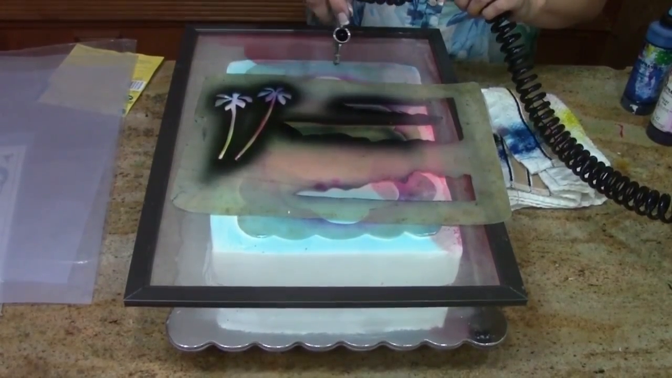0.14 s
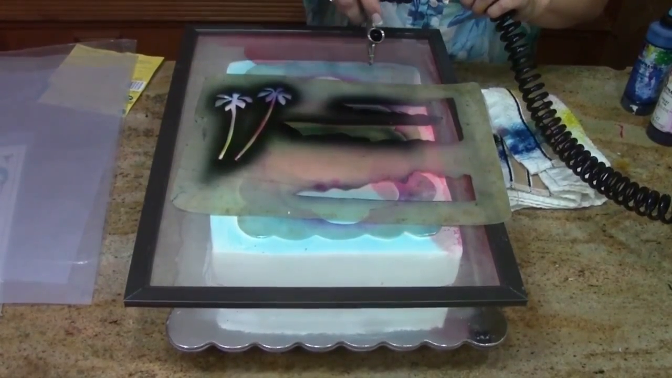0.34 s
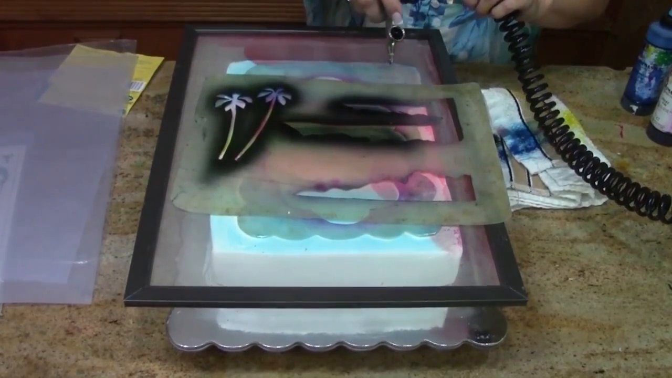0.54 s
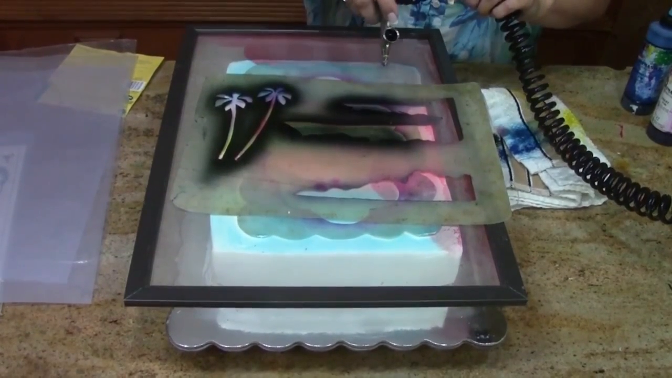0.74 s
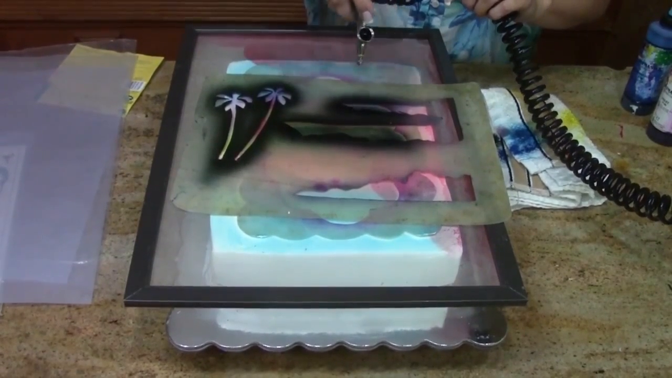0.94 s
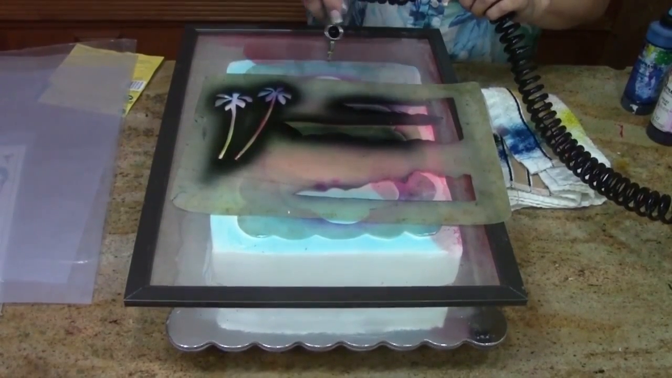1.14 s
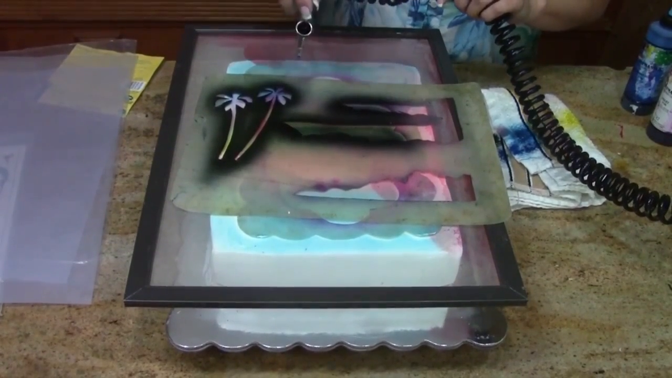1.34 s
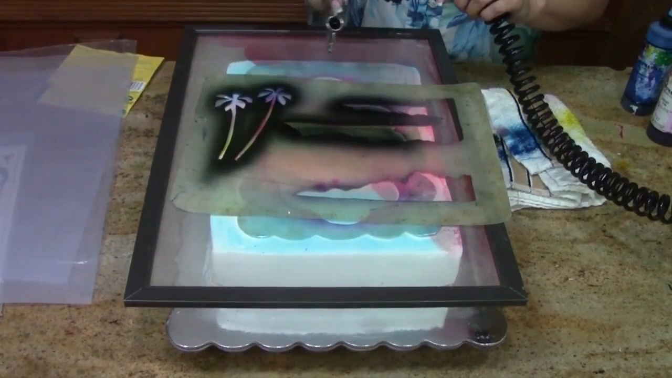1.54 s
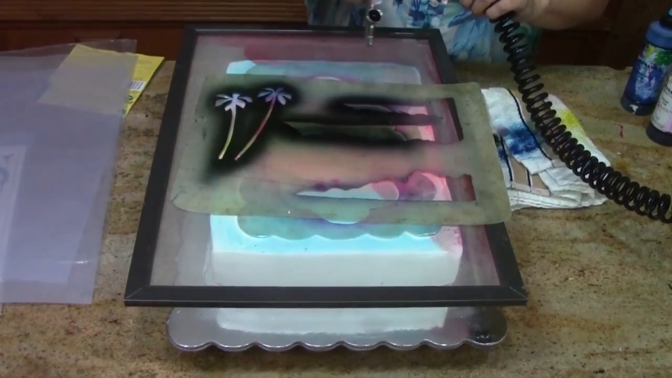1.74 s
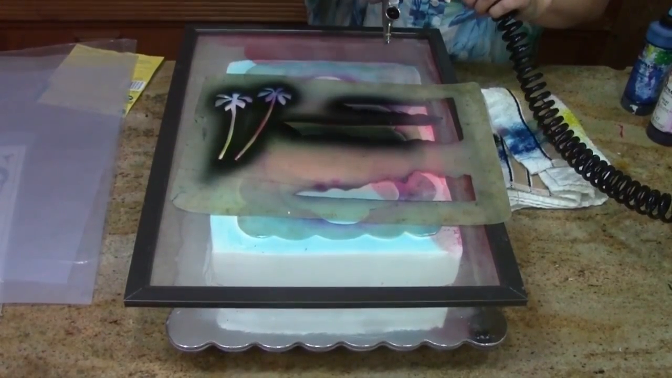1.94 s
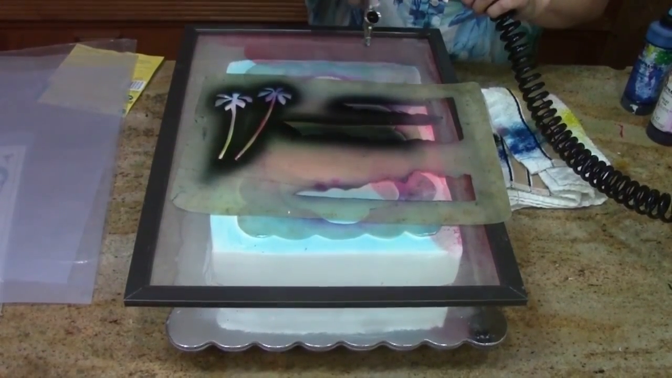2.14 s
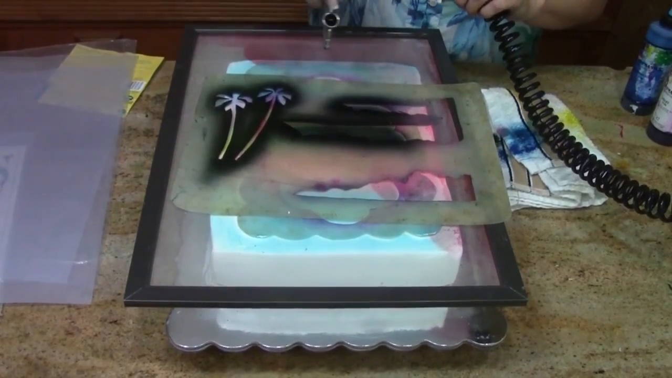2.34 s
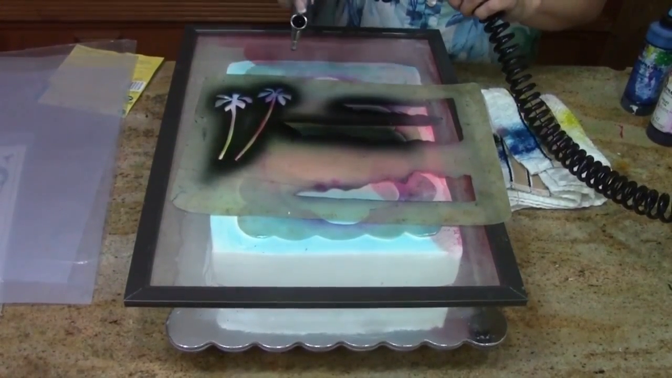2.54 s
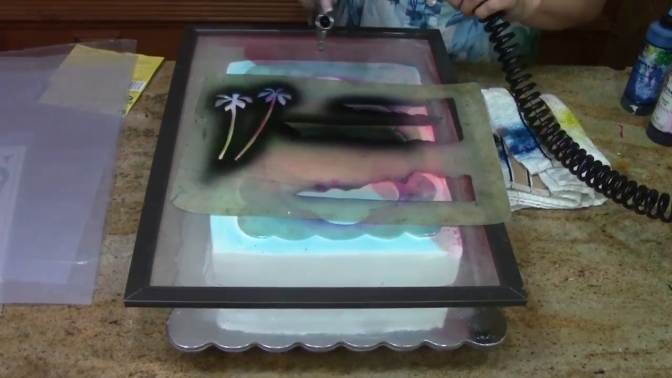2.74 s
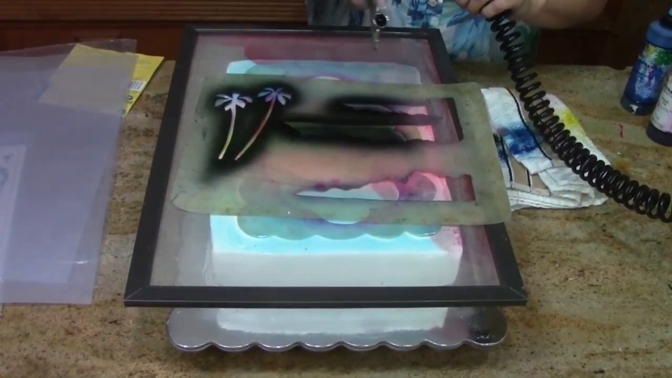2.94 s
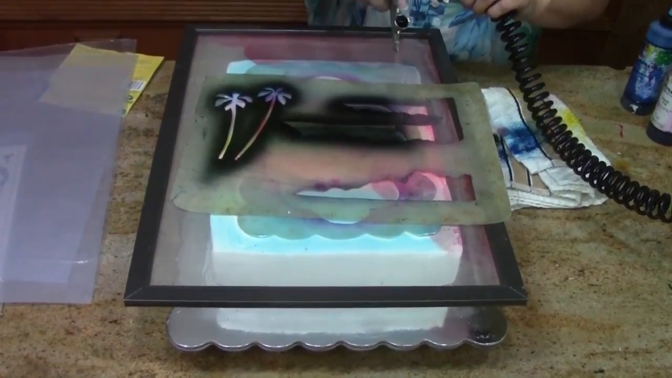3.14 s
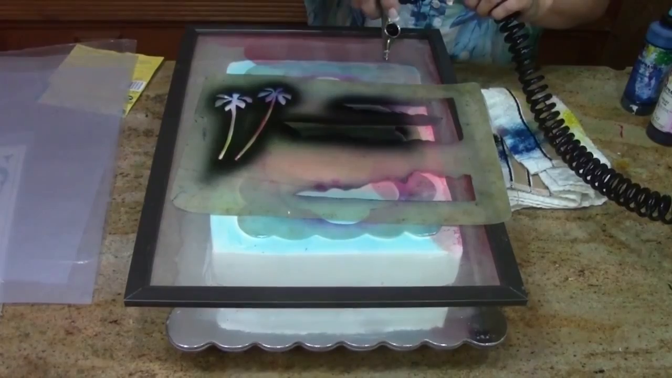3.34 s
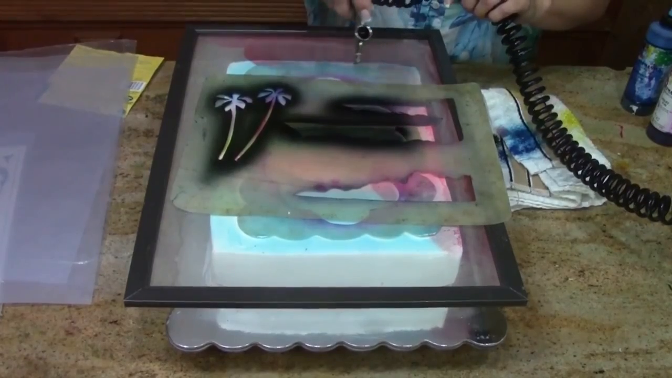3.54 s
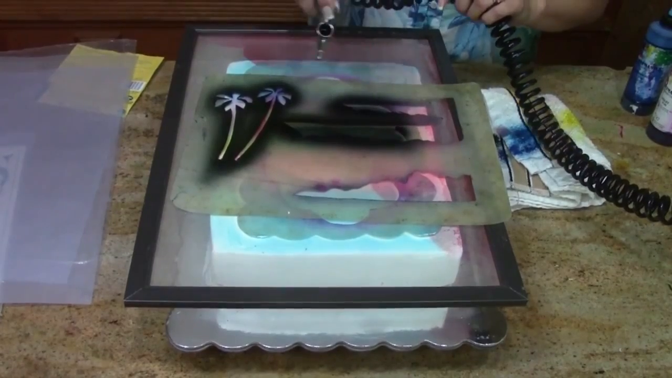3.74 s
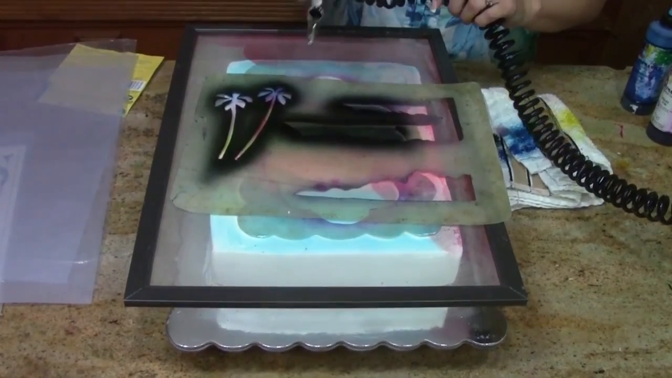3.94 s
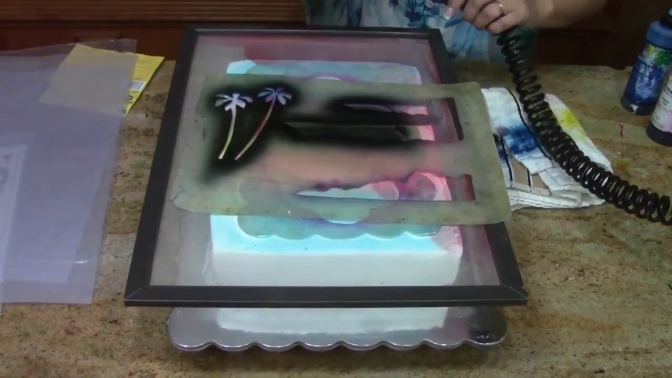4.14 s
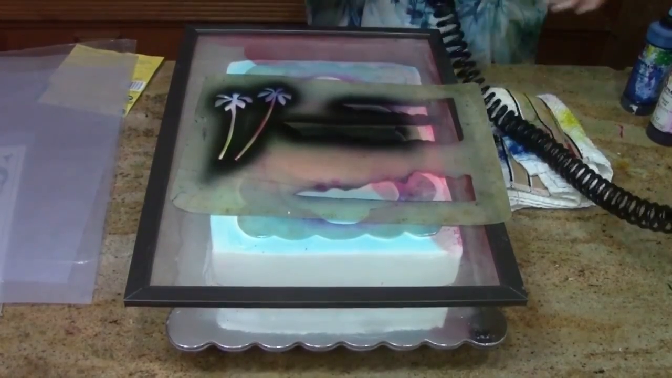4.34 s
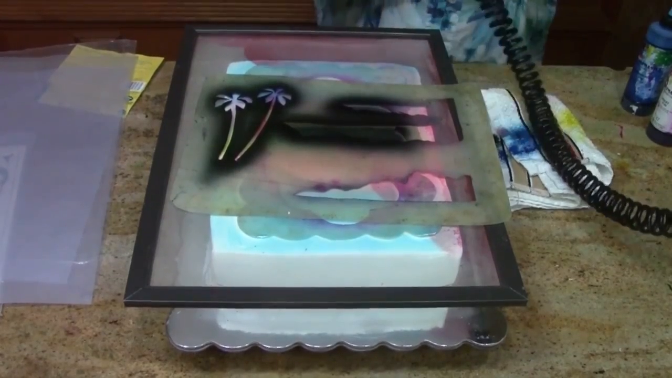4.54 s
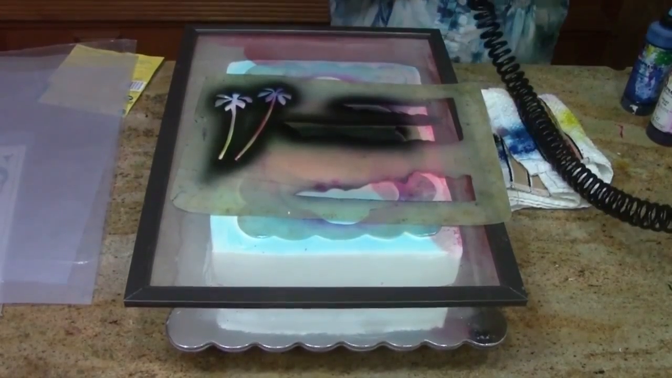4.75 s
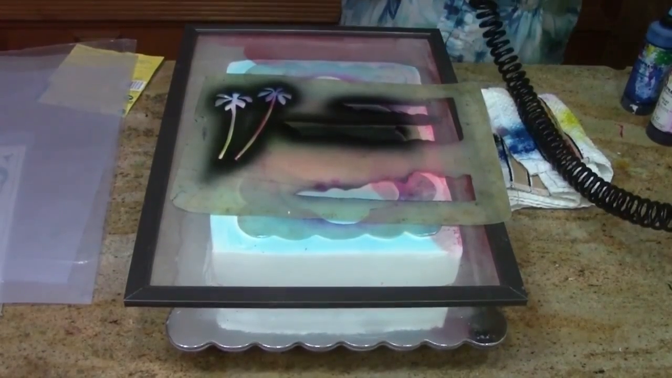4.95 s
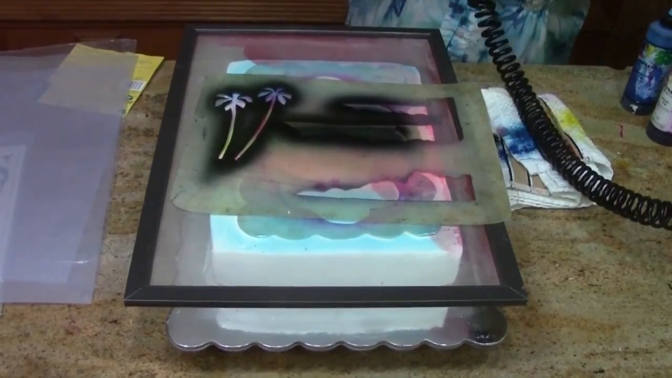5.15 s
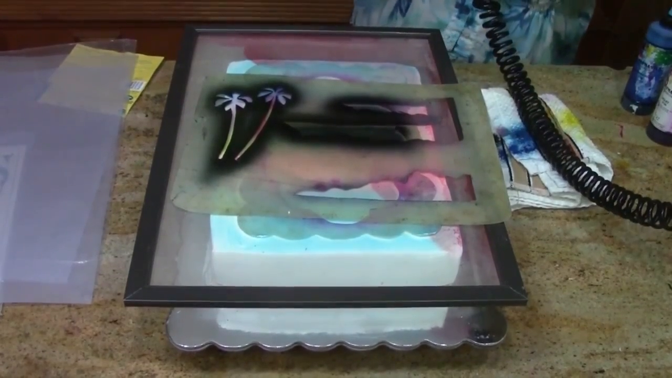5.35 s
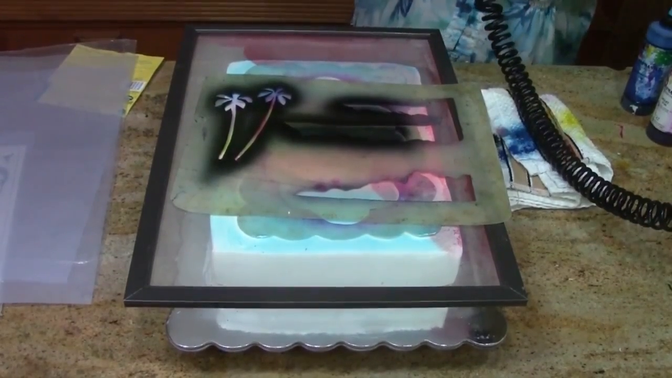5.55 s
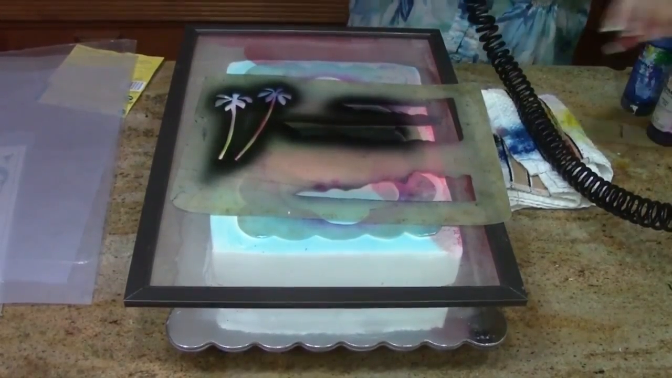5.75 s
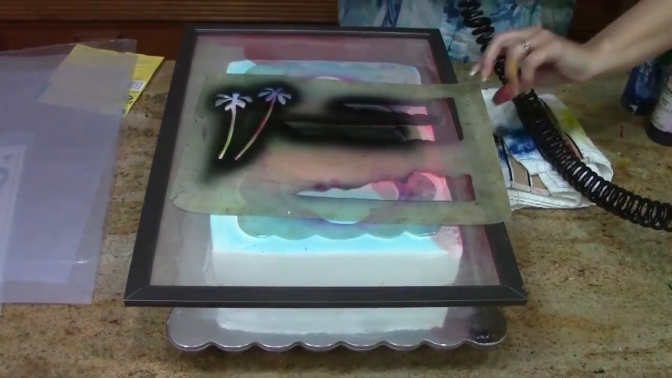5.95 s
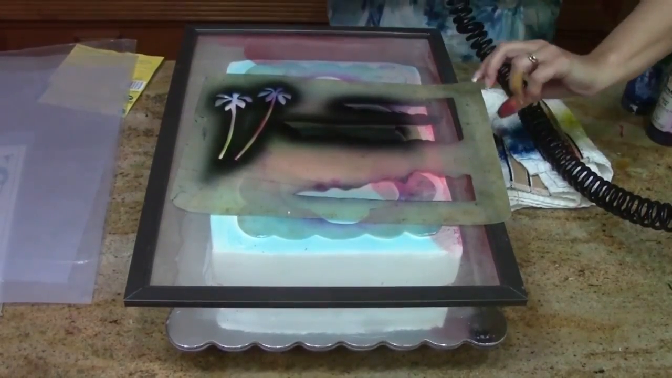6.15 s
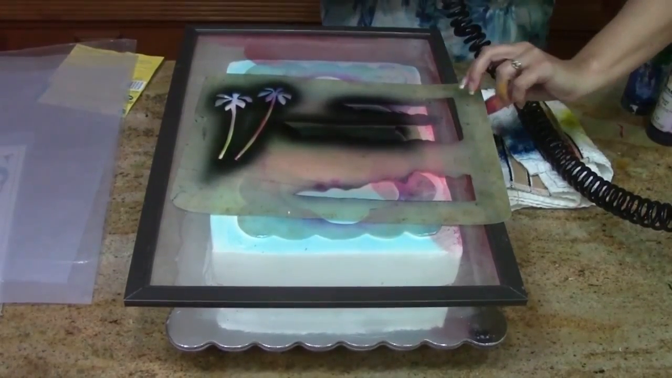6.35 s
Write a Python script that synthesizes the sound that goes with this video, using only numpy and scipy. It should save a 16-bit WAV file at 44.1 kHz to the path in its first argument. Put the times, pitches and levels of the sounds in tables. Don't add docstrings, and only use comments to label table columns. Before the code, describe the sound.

In a small room, heard from about arm's length, a piston compressor drones with a low, rough buzz, fast fluttering inlet gasps and housing rattle. Over it an airbrush hisses brightly in separate passes: one already under way until 0.7 s, another at 0.8-1.3, a softer one at 1.4-2.0, one swelling from 2.1 to 2.7, a fuller, fading one at 2.75-3.4 with a sharp spit near 3.25, and a strong last one at 3.5-4.1. Brief hollow rushes mark stencil edges. From 4.1 the compressor and a thin, weakening air seep continue. At 5.26 a plastic switch clicks, air puffs, and the motor collapses; rough hollow knocks follow at 5.4 and 5.47, slowing. At 5.6 a louder, crisp relay snap rings briefly in the room. The remaining leak hiss fades quickly into low house rumble, with a faint distant whirr from 5.9 to the end at about 6.4.

```python
import sys
import numpy as np
from scipy import signal
from scipy.fft import rfft, irfft, next_fast_len
from scipy.io import wavfile
from scipy.ndimage import map_coordinates

SR = 44100
rng = np.random.default_rng(int(sys.argv[2]) if len(sys.argv) > 2 else 0)


def rack_gain(trim_db):
    fader = np.asarray(trim_db, float)
    return 10 ** (fader / 20)


def transcribe(u):
    v = np.clip(np.atleast_2d(u).T, -1, 1)
    q = np.round(v * 32767).astype(np.int16)
    wavfile.write(sys.argv[1], SR, q)


N = 285760

PUMP_HZ = 27.922
SWITCH_OFF_S = 5.295
INTAKE_OPENS, INTAKE_SHARE = 0.65, 0.382

# pitch_hz, level_db (per Hz)
NOZZLE = [(3000, -11.5), (4200, -9), (5400, -7), (6500, -3.5), (8000, 0), (10300, 2.5), (11500, 0.5),
          (12500, -4.5)]
# pitch_hz, level_db (per Hz)
SPLASH = [(900, -26), (1700, 0.5), (2200, 4), (3100, 4.5), (3600, 2.5), (4700, 2), (5800, -5),
          (7000, -11.5)]
# pitch_hz, level_db (per Hz)
EDGE_COLOUR = [(1500, -15), (2000, -2), (2600, 0.5), (3200, 1), (3900, -11), (6000, -21)]


def escaping_air(time):
    top_gain, body_gain, splash_gain, edge_gain = trigger(time)
    jet = rippled(nearby_echoes(hiss(NOZZLE, patchy_db=0.55)))
    top = coloured(jet, [(8800, -30), (9300, -9), (10000, 0)])
    body = jet - top
    nozzle = top_gain * rms_one(top) + body_gain * rms_one(body)
    spray = nearby_echoes(hiss(SPLASH, patchy_db=0.66))
    rush = coloured_noise(EDGE_COLOUR)
    return (nozzle + splash_gain * spray + edge_gain * rush) * powered(time)


# start_s, end_s, start_level_db, end_level_db, body_db
SWEEPS = [
    (-.1, 0.68, -36, -36.5, -4),
    (0.79, 1.3, -36.5, -36.5, -3.0),
    (1.42, 2.018, -39, -38.5, -3.0),
    (2.12, 2.718, -44.5, -38.5, -1.1),
    (2.75, 3.43, -42.5, -45, 1.3),
    (3.473, 4.074, -36, -36, -2.2),
]
# time_s, level_db, half_length_s, body_db
SPITS = [
    (3.251, -30.5, 0.021, -3),
    (3.37, -41, 0.031, 0.5),
]
# time_s, level_db, half_length_s
EDGES = [(0.024, -37.5, 0.047), (.55, -47, 0.15), (.95, -46, 0.1), (1.42, -42.5, 0.12), (2.247, -48, 0.075),
         (2.67, -41, 0.048), (2.78, -39, 0.046), (3.556, -48, .03)]


def trigger(time):
    pull_s, ease_s = 0.095, 0.09
    idle_db, idle_body_db = -42, 0.4
    let_go_s, sag_db_per_s = 4.23, 4
    throb_share = 0.15
    splash_db, splash_idle_db = -49, -48

    sag_db = -sag_db_per_s * np.maximum(time - let_go_s, 0)
    throb = 1 + throb_share * (2 * inlet_open(time) - 1)
    top = (throb * rack_gain(idle_db + sag_db)) ** 2
    body = top * rack_gain(idle_body_db) ** 2
    pulled = 0
    for start, end, from_db, to_db, body_db in SWEEPS:
        travel = np.clip(np.minimum((time - start) / pull_s, (end - time) / ease_s) + 0.5, 0, 1)
        flow = (travel * rack_gain(np.interp(time, [start, end], [from_db, to_db]))) ** 2
        top = top + flow
        body = body + flow * rack_gain(body_db) ** 2
        pulled = pulled + travel
    for s, db, half, body_db in SPITS:
        flow = (rack_gain(db) * bump(time, s, half)) ** 2
        top = top + flow
        body = body + flow * rack_gain(body_db) ** 2
    splash = rack_gain(splash_idle_db) ** 2 + (rack_gain(splash_db) * pulled) ** 2
    edge = sum((rack_gain(db - 1.5) * bump(time, s, half)) ** 2 for s, db, half in EDGES)
    return np.sqrt([top, body, splash, edge])


def hiss(spectrum, patchy_db):
    out, together = 0, drift(5.0)
    white = [coloured(w, spectrum) for w in rng.standard_normal((2, N))]
    edges = np.geomspace(800, 14000, num=9)
    for k, (low, high) in enumerate(zip(edges, edges[1:])):
        band_pass = signal.butter(2, [low, high], "band", fs=SR, output="sos")
        band = signal.sosfilt(band_pass, white[k % 2])
        out = out + band * rack_gain(patchy_db * (0.83 * together + drift(10.0)))
    return rms_one(out)


def rippled(jet):
    lag_ms = 0.165 + 0.012 * drift(0.8)
    late = map_coordinates(jet, [np.arange(N) - lag_ms * SR / 1000], order=3, mode="nearest")
    return jet + rack_gain(-16) * late


# delay_ms, level_db
ECHOES = [(2.3, -17), (4.1, -16), (7.7, -16), (12.1, -17)]


def nearby_echoes(x):
    return rms_one(x + sum(rack_gain(db) * np.roll(x, round(ms * SR / 1000)) for ms, db in ECHOES))


# pitch_hz, width_hz, level_db
HOUSING = [(91.5, 49, -64.5), (165, 180, -62), (288, 180, -58.5), (390, 81, -56.5), (760, 100, -50.5),
           (1004, 49, -53), (1270, 214, -48.5), (1620, 12, -62)]


def compressor(time):
    turn = PUMP_HZ * time
    drone = rack_gain(-44.5) * crank_orders(time)
    valves = valve_open(turn, 0.073, 0.387) + 0.5 * valve_open(turn, 0.556, 0.49)
    shaking = rng.standard_normal(N) * (0.5 + valves)
    rattle = sum((-1) ** i * rack_gain(db) * rms_one(ring(shaking, hz, 1.7 / width))
                 for i, (hz, width, db) in enumerate(HOUSING))
    return powered(time) * drone + powered(time) ** 0.13 * rattle


# order (multiple of the crank rate), level_db
PUMP_ORDERS = [(3, -11), (4, -14), (6, -4), (7, -6.5), (8, -9.5), (9, -12.5), (10, -4.5), (11, -9),
               (12, -14.5), (13, -7), (14, 0), (16, -8), (18, -13), (21, -9), (22, -12.5), (24, -1),
               (25, -1), (26, 1), (27, -12), (28, -8.5), (30, -12.5), (35, -9.5), (36, -11.5), (38, -12),
               (15, -14.5), (42, -10), (44, -12), (43, -13), (54, -6.5), (55, -14.5)]
# up_to_hz, moment (share of a turn)
KNOCK_TIMING = [(90, 0.0), (170, .29), (200, .55), (310, .07), (480, .49), (620, .76), (730, .35),
                (815, .8), (930, .38)]


def crank_orders(time):
    orders = np.arange(1, 61)
    levels_db = -21 - 0.14 * orders
    for order, db in PUMP_ORDERS:
        levels_db[order - 1] = db
    tops_hz, shares = np.transpose(KNOCK_TIMING)
    part = np.searchsorted(tops_hz, orders * PUMP_HZ)
    scattered = rng.random(len(orders))
    timing = np.where(part < len(shares), shares[part % len(shares)], scattered)
    lags = np.cumsum(timing + rng.normal(0, 0.02, len(orders)))
    angle = np.linspace(0, 1, num=4097)
    phase = 2 * np.pi * (np.outer(orders, angle) - lags[:, None])
    lines = rack_gain(levels_db)[:, None] * np.sqrt(2) * np.cos(phase)
    turn = PUMP_HZ * time % 1
    out = np.interp(turn, angle, lines.sum(axis=0))
    for group in range(6):
        weighted = orders[group::6] @ lines[group::6]
        out += 0.0035 * drift(1.3) * np.interp(turn, angle, weighted)
    return out


# crank_orders_added, level_db
MAGNETIC_PULL = [(0, -68), (1, -65), (10, -68), (15, -69), (20, -67), (23, -58), (24, -67), (26, -66),
                 (-26, -67), (-28, -65), (-30, -57), (-35, -66)]


def motor_hum(time):
    magnetic_hz = 119.9
    buzz_hz, buzz_width_hz, buzz_db, scatter_db = 1170, 190, -64.5, 2.0
    orders = np.arange(-64, 56)
    line_hz = np.abs(orders) * PUMP_HZ + np.sign(orders + 0.5) * magnetic_hz
    away = (line_hz - buzz_hz) / buzz_width_hz
    levels_db = buzz_db - 5 * away ** 2 + scatter_db * rng.standard_normal(len(orders))
    for order, db in MAGNETIC_PULL:
        levels_db[orders == order] = db
    levels_db[orders == -1] = -200
    angle = np.linspace(0, 1, num=4097)
    turns = np.outer(np.abs(orders), angle) + rng.random((len(orders), 1))
    lines = rack_gain(levels_db)[:, None] * np.exp(2j * np.pi * turns)
    turn = PUMP_HZ * time % 1
    up = np.interp(turn, angle, lines[orders >= 0].sum(axis=0))
    down = np.interp(turn, angle, lines[orders < 0].sum(axis=0))
    pull = np.exp(2j * np.pi * magnetic_hz * time)
    below = rack_gain(-57.5) * np.exp(-2j * np.pi * PUMP_HZ * time)
    return powered(time) * np.sqrt(2) * np.real((up + below) * pull + down / pull)


# pitch_hz, level_db (per Hz)
INTAKE = [(1800, 4), (3000, -21), (4600, -4), (5600, -7), (7500, 0), (10000, 10), (12000, 6.5)]
# pitch_hz, width_hz, level_db
WHISTLES = [(3030, 140, -61.5), (4740, 230, -57.5), (6800, 200, -63)]


def intake(time):
    gasp = inlet_open(time)
    pipes = sum(rack_gain(db + 1.0 * drift(3.2)) * whistle(hz, width) for hz, width, db in WHISTLES)
    breath = rack_gain(-44.5) * rms_one(gasp * coloured(rng.standard_normal(N), INTAKE))
    return powered(time) * (breath + (0.6 + gasp) * pipes)


# time_s, swell_db, brightness_db, half_length_s
LAST_STROKES = [
    (5.285, -60, -1, .011),
    (5.345, -60, 19, 0.022),
    (5.393, -34, -5.5, 0.02),
    (5.425, -55, 11, 0.019),
    (5.468, -46.5, 0, .022),
    (5.522, -54, 2, 0.021),
    (5.6, -61, -4, 0.041),
]
# pitch_hz, level_db, width_hz, roughness
CYLINDER = [(396, 0, 50, .15), (770, -3, 80, .6), (1200, -16, 80, 1.5), (1510, -12, 60, .6)]


def last_strokes(time):
    out = np.zeros(N)
    sag = 0.87 * np.clip(time - 5.43, 0, 0.3)
    stretched = np.cumsum(1 - sag) / SR
    for i, (hz, db, width, rough) in enumerate(CYLINDER):
        tone = rms_one(np.sin(2 * np.pi * hz * stretched) + rough * whistle(hz, width))
        swell = 0
        for s, blow_db, bright_db, half in LAST_STROKES:
            level_db = blow_db + db - 2.5 + bright_db * (i > 0)
            swell = swell + rack_gain(level_db) * np.exp(-np.clip((time - s) / half, -9, 9) ** 4)
        out += swell * tone
    return out


# level_db, pitch_hz, width_hz, fade_s
SHUDDER = (-49, 120, 200, 0.14)


def shudder(time):
    db, hz, width, fade = SHUDDER
    since = time - SWITCH_OFF_S
    swell = np.clip(since / 0.02 + 1, 0, 1) * np.exp(-np.maximum(since, 0) / fade)
    return rack_gain(db) * swell * whistle(hz, width)


# time_s, peak_db, room_tail_db
SNAPS = [
    (5.259, -23, -24),
    (5.5948, -17, -16),
]
# pitch_hz, level_db, t60_s
SNAP_MODES = [(1360, -9, 0.053), (2500, -0.5, 0.018), (3210, -2, 0.034), (4070, 2, 0.01), (5200, 4, 0.0041),
              (6780, 5, 0.0084), (8900, 4, 0.0062), (10800, 6, 0.0044)]
# pitch_hz, level_db (per Hz)
TAIL = [(700, -2), (1350, -2.5), (1900, -13), (2500, 6.5), (3300, 1), (4800, 0), (7000, -6), (12000, -14)]


def snaps(time):
    out, echo, tail_t60_s = np.zeros(N), coloured_noise(TAIL), 0.36
    for s, peak_db, tail_db in SNAPS:
        click = np.zeros(N)
        click[round(s * SR)] = rack_gain(peak_db - 8.5)
        out += sum((-1) ** i * rack_gain(db) * ring(click, hz, t60)
                   for i, (hz, db, t60) in enumerate(SNAP_MODES))
        since = np.maximum(time - s, 0)
        fade = rack_gain(peak_db + tail_db - 60 * since / tail_t60_s)
        out += fade * np.clip(since / 0.0014, 0, 1) * echo
    return above(out, 1060)


# pitch_hz, level_db (per Hz)
PUFF_COLOUR = [(1500, -14), (3500, -10), (5000, 4), (6500, 4), (8000, -2), (12000, -9)]
# pitch_hz, level_db (per Hz)
LEAK_COLOUR = [(900, -23), (1500, -6.5), (2400, 0.5), (4200, 0), (5700, 3), (8200, 2.5), (9200, 4),
               (12500, 2.5)]


def leak(time):
    vent_s, opens_s, puff_s = 5.27, 0.038, 0.04
    bleeds_from_s, bleed_db_per_s = 5.626, 20
    opened = np.clip((time - vent_s) / opens_s + 1, 0, 1)
    puff = rack_gain(-36) * np.exp(-np.maximum(time - vent_s, 0) / puff_s)
    steady = rack_gain(-44 - bleed_db_per_s * np.maximum(time - bleeds_from_s, 0))
    return opened * (puff * coloured_noise(PUFF_COLOUR) + steady * coloured_noise(LEAK_COLOUR))


# time_s, level_db, half_length_s, pitch_hz, width_hz
SWISH = (5.53, -59, .03, 1950, 400)


def swish(time):
    s, db, half, hz, width = SWISH
    return rack_gain(db) * bump(time, s, half) * whistle(hz, width)


# pitch_hz, level_db (per Hz)
SIDE_TOP = [(8000, -60), (9300, -24), (10200, -7), (10900, -2), (11500, 0), (11800, -12)]


def side_hiss(time):
    return rack_gain(-59 + 5.3 * drift(15.0)) * powered(time) * coloured_noise(SIDE_TOP)


# pitch_hz, level_db (per Hz)
ROOM = [(20, -10), (110, -2.5), (150, -11.5), (300, -9), (1200, -18), (2200, -23), (4000, -25), (8000, -60)]
# pitch_hz, level_db
MAINS_HUM = [(116.6, -67.5)]
# pitch_hz, width_hz, level_db
FAR_WHIRR = [(1010, 120, -73), (1310, 70, -69.5)]
# start_s, end_s
FAR_WHIRR_S = (5.88, 6.4)


def room_tone(time):
    rumble = rack_gain(-59) * coloured_noise(ROOM)
    hum = sum(rack_gain(db) * np.sqrt(2) * np.sin(2 * np.pi * hz * time) for hz, db in MAINS_HUM)
    start, end = FAR_WHIRR_S
    passing = np.clip(np.minimum(time - start, end - time) / 0.05, 0, 1) * rack_gain(2.5 * drift(14.0))
    whirr = sum(rack_gain(db) * whistle(hz, width) for hz, width, db in FAR_WHIRR)
    return rumble + hum + passing * whirr


# pitch_hz, level_db (per Hz)
DIFFUSE = [(20, -3), (60, -7), (150, -2), (400, -15.5), (800, -20), (1500, -31), (2100, -39), (4000, -80)]


def diffuse_rumble():
    return rack_gain(-68) * coloured_noise(DIFFUSE)


def powered(time):
    return np.exp(-np.maximum(time - SWITCH_OFF_S, 0) / 0.018)


def valve_open(turn, opens, share, edge=0.089):
    into = (turn - opens) % 1
    return np.clip(np.minimum(into, share - into) / edge + 0.5, 0, 1)


def inlet_open(time):
    return valve_open(PUMP_HZ * time, INTAKE_OPENS, INTAKE_SHARE)


def bump(time, s, half):
    return np.exp(-0.5 * ((time - s) / half) ** 2)


def drift(rate):
    r = np.exp(-80 * np.pi * rate / SR)
    slow = signal.lfilter([1], [1, -2 * r, r * r], rng.standard_normal(N // 40 + 2002))[2000:]
    return np.interp(np.arange(N) / 40, np.arange(len(slow)), rms_one(slow))


def ring(clicks, hz, t60):
    r, w = rack_gain(-60 / (t60 * SR)), 2 * np.pi * hz / SR
    return signal.lfilter([0, np.sin(w)], [1, -2 * r * np.cos(w), r * r], clicks + 1e-18)


def whistle(hz, width):
    once = ring(rng.standard_normal(N), hz, 2.0 / width)
    return rms_one(ring(once, hz, 0.77 / width))


def coloured(x, spectrum):
    size = next_fast_len(N + 4096)
    hz = np.maximum(np.fft.rfftfreq(size, 1 / SR), 1)
    return irfft(rfft(x, size) * rack_gain(at_hz(spectrum, hz)), size)[:N]


def coloured_noise(spectrum):
    return rms_one(coloured(rng.standard_normal(N), spectrum))


def at_hz(points, hz):
    table_hz, values = np.transpose(points)
    return np.interp(np.log(hz), np.log(table_hz), values)


def above(x, hz, order=4):
    return signal.sosfilt(signal.butter(order, hz, "high", fs=SR, output="sos"), x)


def rms_one(x):
    return x / np.sqrt(np.mean(x ** 2) + 1e-20)


def scene():
    time = np.arange(N) / SR
    snap = snaps(time)
    mid = escaping_air(time) + compressor(time) + motor_hum(time) + intake(time)
    mid += last_strokes(time) + shudder(time) + snap + leak(time) + swish(time) + room_tone(time)
    side = side_hiss(time) + diffuse_rumble()
    first_arrival = np.abs(time - SNAPS[-1][0]) < 0.005
    side += rack_gain(-16) * first_arrival * np.roll(snap, 9)
    return np.array([mid + side, mid - side])


def top_cut(x):
    return signal.sosfilt(signal.butter(12, 12720, fs=SR, output="sos"), x)


# pitch_hz, level_db
TOP_CUT = [(11500, 0), (11850, -4), (12040, -14), (12150, -38), (12220, -75)]


def record(dry):
    mix = np.array([coloured(channel, TOP_CUT) for channel in dry])
    return top_cut(mix)


dry = scene()
out = record(dry)
transcribe(out)
```